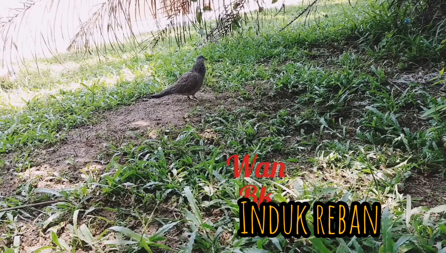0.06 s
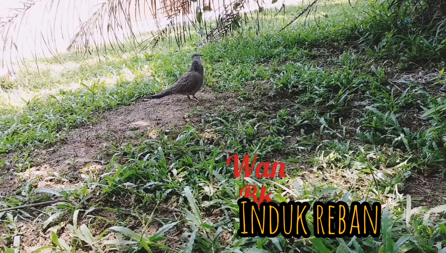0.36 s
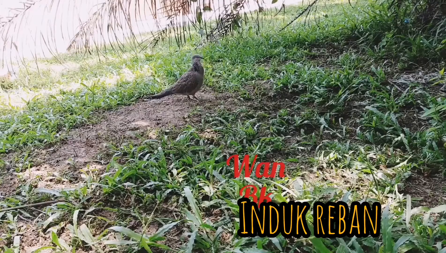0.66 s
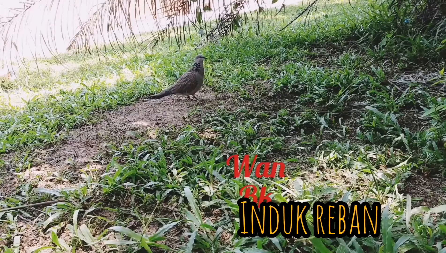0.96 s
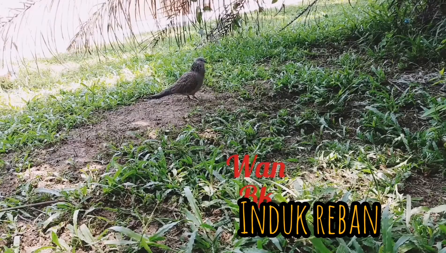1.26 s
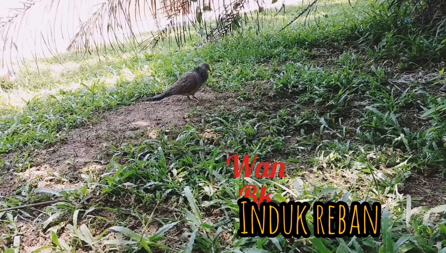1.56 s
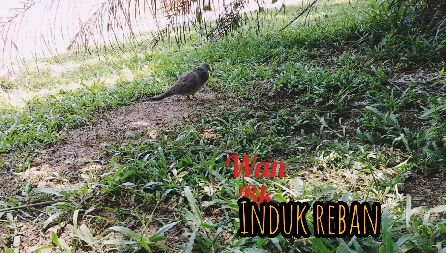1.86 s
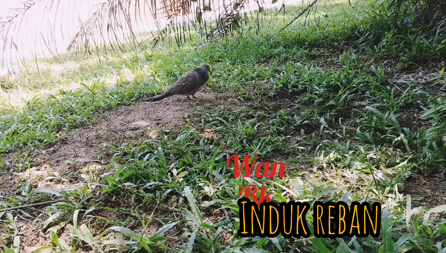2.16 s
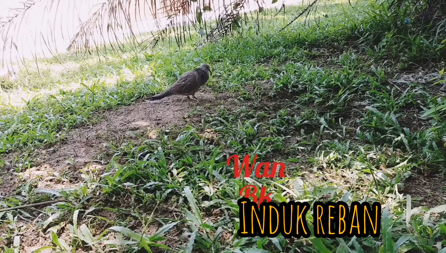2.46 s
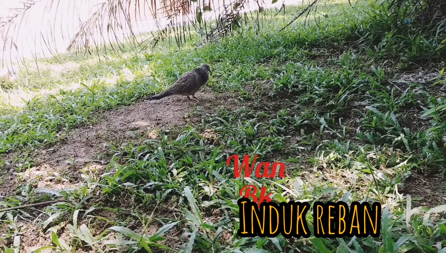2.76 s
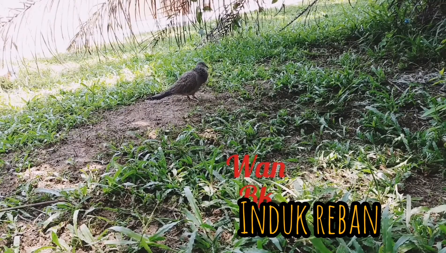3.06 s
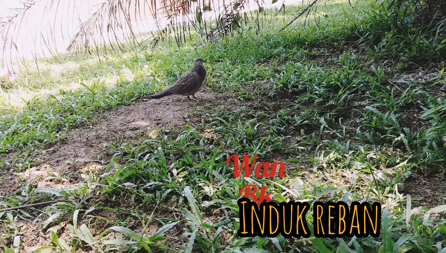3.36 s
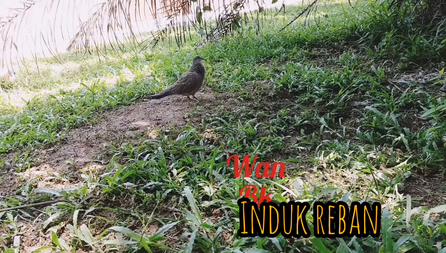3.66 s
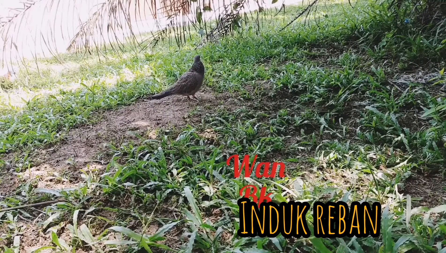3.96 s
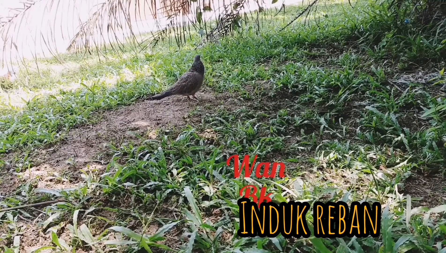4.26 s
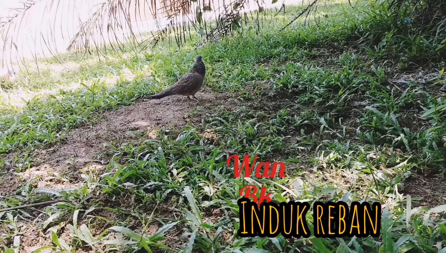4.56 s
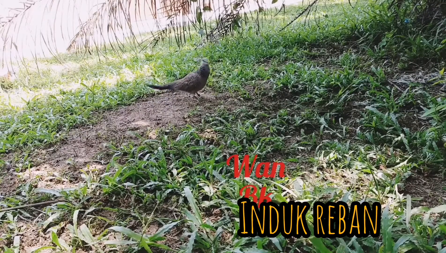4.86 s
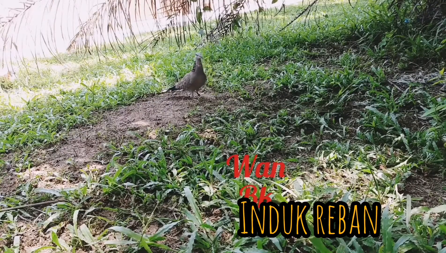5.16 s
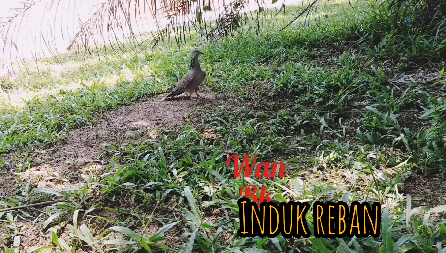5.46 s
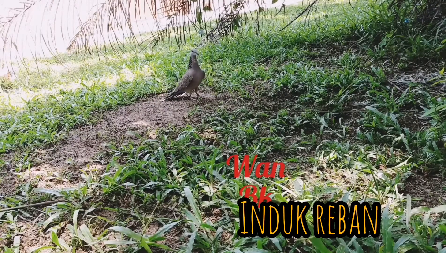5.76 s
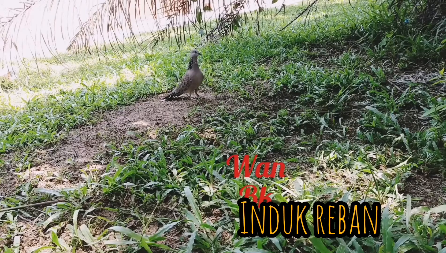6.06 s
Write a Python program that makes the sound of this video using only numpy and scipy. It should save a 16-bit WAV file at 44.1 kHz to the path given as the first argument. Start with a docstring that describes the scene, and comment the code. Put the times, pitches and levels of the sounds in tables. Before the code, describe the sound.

Four soft coos from a close dove, one of them rolled, with faint high chirping and low far-off traffic.

```python
"""Spotted dove on a shaded lawn

Close to a single microphone, a dove sings through its puffed throat: a clipped note, a swelling coo,
a rolled coo and a short last coo. Small birds chirp from the trees around; far off, a second dove
answers faintly and a bird gives a falling whistle. Distant traffic and a thin insect hiss lie under it."""
import sys
import numpy as np
from scipy import signal
from scipy.fft import rfft, irfft
from scipy.io import wavfile

SR = 44100
rng = np.random.default_rng(int(sys.argv[2]) if len(sys.argv) > 2 else 0)


def to_wav(s):
    """Save 16-bit WAV."""
    ch = np.atleast_2d(s).T  # columns
    pcm = np.round(np.clip(ch, -1, 1) * 32767)  # PCM
    wavfile.write(sys.argv[1], SR, pcm.astype(np.int16))


N = 273861
T = np.arange(N) / SR

# the near dove's coos: (start [s], break up [s], break down [s], end [s], first pitch [Hz],
# top pitch [Hz], sagged pitch [Hz], lateness of the sag [power], level [dB], swell while held [dB])
DOVE_COOS = [ (1.446, 1.458, 1.490, 1.514, 490, 718, 728, 2.0, -25.7, -.8),
             (1.676, 1.759, 1.944, 1.960, 462, 728, 697, 2.2, -23.1, 3.9),
             (2.164, 2.167, 2.513, 2.630, 620, 796, 668, 1.4, -26.6, 7.0),
             (2.982, 3.005, 3.131, 3.180, 600, 708, 673, 2.8, -22.4, 1.9)]
# brief glides in its throat, some soft and on their own, some opening or closing a coo: (start [s], length [s],
# from [Hz], to [Hz], level [dB])
THROAT_GLIDES = [(1.495, 0.034, 700, 600, -44.5), (1.537, 0.034, 490, 687, -49),
                 (1.575, 0.018, 450, 436, -40.5), (1.64, 0.0091, 440, 521, -43.5),
                 (2.147, 0.015, 545, 640, -27.5), (2.946, 0.01, 340, 522, -43),
                 (2.965, .016, 535, 580, -30)]
# its octave overtone, weakest near the throat's tuning: (pitch [Hz], level re fundamental [dB])
OCTAVE_LEVELS = [(350, 11), (440, -11), (500, -20.5), (580, -35.5), (640, -49), (695, -58.5), (725, -45.5),
                 (770, -42)]
# one bird in the trees: (start [s], level [dB], pitch [ratio], length [ratio],
# swell towards the end [dB], swell in the zigzag [dB])
TREE_CHIRPS = [(.176, -60, 1.0, 1.05, 6, 3), (.738, -66.5, 1.0, 1.1, 9, 3), (1.452, -58, 1.0, 1.0, -2, -3),
               (3.255, -68, 1.03, .6, -6, 0), (3.412, -54, 1.01, .95, -3, -1),
               (3.802, -55, 1.0, 1.0, -4, 0), (3.945, -64, .96, 1.1, 0, -2), (4.214, -53, 1.0, 1.02, -3, 1),
               (4.630, -58, 1.0, 1.0, -2, -3), (5.728, -66, .96, 1.0, 0, 0)]
# small birds deeper in the trees: (start [s], length [s], from [Hz], to [Hz], level [dB])
THIN_SLURS = [(0, 0.036, 2960, 2680, -69.5, 0.067), (0.165, 0.028, 5100, 4500, -67, .025),
              (0.185, 0.036, 4320, 4305, -58, 0.0065), (0.468, 0.091, 4530, 5090, -65, .015),
              (0.502, .05, 4950, 5800, -68, 0.025), (1.051, .115, 4790, 5780, -66, .018),
              (0.774, .19, 5030, 5190, -85.5, 0.0104), (2.511, .11, 2980, 2944, -76.5, 0.011),
              (5.419, .17, 2814, 2995, -74, 0.045), (5.959, 0.11, 2860, 2960, -69.5, .05)]
# the far dove: (start [s], length [s], from [Hz], to [Hz], level [dB])
ANSWERING_COOS = [(5.039, .11, 655, 687, -65.5), (5.327, 0.306, 727, 625, -70)]
# a far bird's whistle: (time [s], pitch [Hz], level [dB])
FALLING_WHISTLE = [(5.76, 1786, -75), (5.786, 1744, -66), (5.876, 1769, -61.5), (5.974, 1740, -49.5),
                   (6.076, 1662, -48), (6.2, 1480, -58)]
# spectra of traffic, airy hiss and rustling grass: (frequency [Hz], relative density [dB])
TRAFFIC_SPECTRUM = [(15, -64), (25, -33.5), (32, -28), (40, -24.5), (63, -3), (91, 1.5), (121, -3.5),
                    (178, -14), (231, -13), (350, -23.5), (680, -32), (757, -33), (1000, -37),
                    (1300, -70.5), (2200, -120)]
AIR_SPECTRUM = [(590, -24.5), (1000, -7.5), (1160, -5.5), (1330, -6.5), (1440, -6.5), (1990, -8.5),
                (2740, -10.5), (6120, -20), (6950, -20), (7880, -21.5), (15500, -15)]
GRASS_SPECTRUM = [(300, 4), (850, -0.5), (2000, -6), (4500, -18), (9000, -18), (15500, -19.5)]


def dove():
    """Close by, the syrinx sings a near sine into the ringing throat; ground and trees reflect it."""
    throat_hz, throat_width_hz = 660, 100
    bend, flow = roll()
    jitter = .0015 + .023 * (1 - flow)  # least steady while the syrinx is pinched
    bend = bend * (1 + jitter * drift(200))
    flow = flow * from_db(.12 * drift(110))
    tone, overtone = np.zeros(N), np.zeros(N)
    for hz, level in [coo(*row) for row in DOVE_COOS] + [throat_glide(*row) for row in THROAT_GLIDES]:
        phase = phase_of(hz * bend)
        # away from the throat's tuning the same loudness takes more drive
        drive = np.hypot(1, (hz - throat_hz ** 2 / hz) / throat_width_hz)
        tone += level * flow * drive * np.sin(phase)
        overtone += level * flow * from_db(at_hz(OCTAVE_LEVELS, hz)) * np.sin(2 * phase)
    radius = np.exp(-np.pi * throat_width_hz / SR)
    feedforward = (1 - radius ** 2) / 2 * np.array([1, 0, -1])
    feedback = [1, -2 * radius * np.cos(2 * np.pi * throat_hz / SR), radius ** 2]
    voice = signal.lfilter(feedforward, feedback, tone + 1e-18) + overtone
    near = from_db(-31) * trees(voice, t60=.08, build_s=.008)
    far = from_db(-32.5) * trees(voice, t60=.63, build_s=.022)
    return voice + near + far


def coo(start, up, down, end, from_hz, top_hz, sagged_hz, sag_power, db, swell_db):
    """Pitch and amplitude of a coo: it climbs, breaks up into a clear held tone, breaks down and sinks."""
    break_up_hz, break_down_hz, break_s = 644, 569.8, .015
    slip_hz, slip_s, falter_db = 26, .018, -3
    sink_hz_per_s, sink_db_per_s = 780, 23.5
    full_voice_hz, weak_db_per_octave = 621.7, 43
    held = progress(up, down)
    sinking_s = (end - down) * progress(down, end)
    climb = from_hz + (break_up_hz - from_hz) * progress(start, up) ** 2
    slip = slip_hz * progress(down - slip_s, down) ** 2
    top = top_hz + (sagged_hz - top_hz) * held ** sag_power - slip
    droop_hz = 166 * progress(end - .028, end) ** 2  # the air runs out
    sink = break_down_hz - sink_hz_per_s * sinking_s - droop_hz
    risen, dropped = (progress(s - break_s / 2, s + break_s / 2) for s in (up, down))
    hz = (1 - risen) * climb + (risen - dropped) * top + dropped * sink
    held_db = db + swell_db * held ** 1.55
    effort_db = held_db + falter_db * np.sin(np.pi * dropped) - sink_db_per_s * sinking_s
    weak_db = weak_db_per_octave * np.maximum(np.log2(full_voice_hz / hz), 0)
    return hz, from_db(effort_db - weak_db) * gate(start, end)


def throat_glide(start, length, from_hz, to_hz, db):
    """Pitch and amplitude of a brief glide in the throat, on its own or opening or closing a coo."""
    end = start + length
    return from_hz + (to_hz - from_hz) * progress(start, end), from_db(db) * gate(start, end)


def roll():
    """Pitch and flow factors of the rolled coo: each beat opens low, scoops up and is pinched off."""
    start, length_s, lead_s = 2.1665, .27, .0075
    beat_hz, quickening_hz = 46.2, 21
    scoop, scoop_share, open_share, shut_db = .33, .2, .63, -18
    elapsed = progress(start, start + length_s)
    beats = beat_hz * (T - start) + np.cumsum(quickening_hz * elapsed ** 3) / SR
    depth = (1 - elapsed ** 11) * progress(start - lead_s, start - lead_s / 2)
    along = (beats + .02 * drift(45)) % 1
    opening = np.clip(1 - along / scoop_share, 0, 1)
    # as the roll fades the closures become brief
    closing = np.clip(1 - (1 - along) / ((1 - open_share) * depth + 1e-6), 0, 1)
    # the flow is shut off early in the closure and bursts back before the pitch has risen
    shut = np.maximum(opening ** 6, np.minimum(3 * closing ** 1.5, 1))
    return 1 - scoop * depth * np.maximum(opening, closing), from_db(shut_db * depth * shut)


def chirping_bird():
    """From the trees one bird repeats its chirp, never quite alike, with an echo and a scattered tail."""
    off_pitch = 1 + .012 * drift(80)
    off_level = from_db(1.5 * drift(80))
    notes = (chirp(*row) for row in TREE_CHIRPS)
    direct = sum(whistle(hz * off_pitch, level * off_level, waver=.012) for hz, level in notes)
    heard = direct + from_db(-14.5) * echo(direct, delay_s=.11)
    near = from_db(-6.5) * trees(heard, t60=.2, build_s=.008)
    far = from_db(-12) * trees(heard, t60=.6, build_s=.04)
    return from_db(-2.5) * heard + near + far


def chirp(start, db, pitch, stretch, end_db, zigzag_db):
    """Pitch and amplitude of one chirp: a rising lead-in, a zigzag of two swoops, a closing note."""
    lead_s, swoop_s, close_s, edge_s = .03, .041, .04, .01
    fall_share, upswing_db, close_db, edge_db = .6, -8, -2.5, -3
    swoop_at, close_at, end = start + stretch * np.cumsum([lead_s, 2 * swoop_s, close_s])
    turn = 2 * progress(swoop_at, close_at) % 1
    lead_hz = 2610 - 220 * (1 - progress(start, swoop_at)) ** 3
    swoop_hz = np.interp(turn, [0, fall_share, 1], [3092, 2460, 3092])
    close_hz = 2906 - 406 * progress(close_at, end) ** 3 + 80 * drift(150)
    parts = [T < swoop_at, T < close_at]
    part_db = np.select(parts, [0, zigzag_db + upswing_db * (turn > fall_share)], close_db)
    edges = 1 - progress(start, start + edge_s) + progress(end - edge_s, end)
    level_db = db + end_db * progress(start, end) + edge_db * edges + part_db
    return pitch * np.select(parts, [lead_hz, swoop_hz], close_hz), from_db(level_db) * gate(start, end)


def small_birds():
    """High slurs with a strong echo from deep in the trees, and one dry chip nearer the microphone."""
    direct = sum(slur(*row) for row in THIN_SLURS)
    heard = direct + from_db(-1) * echo(direct, delay_s=.078)
    tail = trees(heard, t60=.34, build_s=.027)
    chip = slur(start=2.205, length=.038, from_hz=4230, to_hz=3950, db=-66.5, waver=.025)
    return heard + tail + chip


def far_birds():
    """The falling whistle and the answering dove, softened by distance."""
    hz, db = in_time(FALLING_WHISTLE)
    level = from_db(db - 1) * gate(FALLING_WHISTLE[0][0], T[-1])
    direct = whistle(hz, level, waver=.002) + sum(slur(*row) for row in ANSWERING_COOS)
    return from_db(-1) * direct + from_db(-8) * trees(direct, t60=.6, build_s=.02)


def traffic():
    """Distant traffic arrives as a low, gently wavering rumble."""
    return from_db(-47.5 + drift(7.6)) * shaped_noise(TRAFFIC_SPECTRUM)


def air_and_insects():
    """Around the lawn: an airy hiss, the narrow band of an insect chorus and a brief, very high whine."""
    insect_hz, half_width_hz = 7073, 260
    hiss = from_db(-68.5) * shaped_noise(AIR_SPECTRUM)
    chorus = from_db(-80 + drift(30)) * band_noise(insect_hz - half_width_hz, insect_hz + half_width_hz)
    whine = slur(start=2.18, length=.6, from_hz=11700, to_hz=11930, db=-72.5, waver=.001)
    flicker = np.clip(1 + drift(45), 0, np.sqrt(2))
    return hiss + chorus + whine * flicker


def grass():
    """A soft rustle in the grass swells, then starts to settle."""
    start, attack_s, fade_db_per_s = 6.055, .025, 14
    db = -63.5 - fade_db_per_s * np.maximum(T - start, 0) + 2.7 * drift(90)
    return progress(start, start + attack_s) * from_db(db) * shaped_noise(GRASS_SPECTRUM)


def trees(x, t60, build_s):
    """Trunks and leaves scatter a sound into many small echoes that build up and die away."""
    t = T[:SR]
    echoes = rng.standard_normal(SR) * (1 - np.exp(-(t / build_s) ** 2)) * from_db(-60 * t / t60)
    return signal.fftconvolve(x, echoes / np.sqrt(np.sum(echoes ** 2)))[:N]


def echo(x, delay_s):
    """One distinct reflection."""
    return np.interp(T - delay_s, T, x, left=0)


def slur(start, length, from_hz, to_hz, db, waver=.0022):
    """A whistle that eases to its goal pitch while it swells and fades."""
    along = progress(start, start + length)
    swell = np.interp(along, [0, .32, 1], [0, 1, 0])
    hz = to_hz + (from_hz - to_hz) * (1 - along) ** 1.5
    return whistle(hz, np.sqrt(2) * from_db(db) * np.sin(swell * np.pi / 2), waver)


def whistle(hz, level, waver):
    """A nearly pure note; a fast waver of its pitch makes it raspy."""
    return level * np.sin(phase_of(hz * (1 + waver * drift(350))))


def gate(start, end):
    """Peak amplitude of a unit-power note that eases in and stops quickly."""
    attack_s, release_s = .009, .004
    opened = np.clip(np.minimum((T - start) / attack_s, (end - T) / release_s) + .5, 0, 1)
    return np.sqrt(2) * np.sin(opened * np.pi / 2) ** 2


def band_noise(low_hz, high_hz):
    """Band-passed noise of unit power."""
    band = signal.butter(2, [low_hz, high_hz], "band", fs=SR, output="sos")
    return rms_one(signal.sosfilt(band, rng.standard_normal(N)))


def shaped_noise(spectrum):
    """Noise of unit power with a given spectrum, silent beyond its ends."""
    hz = np.arange(N // 2 + 1) * SR / N
    inside = (hz > spectrum[0][0]) & (hz < spectrum[-1][0])
    return rms_one(irfft(rfft(rng.standard_normal(N)) * from_db(at_hz(spectrum, hz)) * inside, N))


def drift(rate):
    """Random wander through `rate` values a second, drawn with unit spread."""
    knots = rng.standard_normal(8192)
    return np.interp(T * rate, np.arange(len(knots)), knots)


def progress(start, end):
    """Runs from 0 to 1 between two times."""
    return np.clip((T - start) / max(end - start, 1e-4), 0, 1)


def phase_of(hz):
    """Running phase of a gliding tone."""
    return 2 * np.pi * np.cumsum(hz) / SR


def in_time(rows):
    """Each column of a curve at every sample."""
    times, *columns = np.transpose(rows)
    return [np.interp(T, times, column) for column in columns]


def at_hz(points, hz):
    """Read a table on a log-frequency axis."""
    freqs, values = np.transpose(points)
    return np.interp(np.log(hz + 1e-3), np.log(freqs), values)


def from_db(db):
    """Decibels to gain."""
    return 10 ** (np.asarray(db) / 20)


def rms_one(x):
    """Scale to unit power."""
    return x / np.sqrt(np.mean(x ** 2) + 1e-20)


def scene():
    """The whole lawn from one spot, in mono."""
    birds = dove() + chirping_bird() + small_birds() + far_birds()
    return (birds + traffic() + air_and_insects() + grass())[None]


def record(dry):
    """The microphone's signal is cut steeply at the top."""
    cutoff_hz = 15750
    return signal.sosfilt(signal.ellip(12, .1, 90, cutoff_hz, fs=SR, output="sos"), dry)


dry = scene()
out = record(dry)
to_wav(out)
```